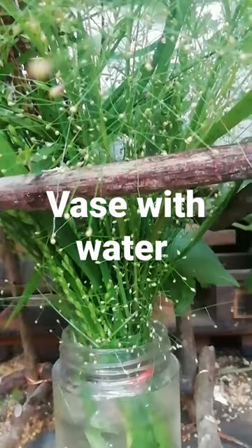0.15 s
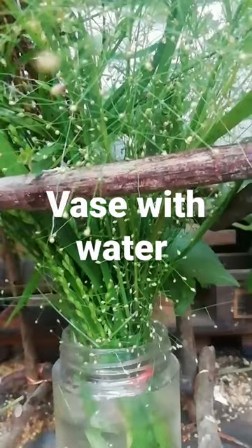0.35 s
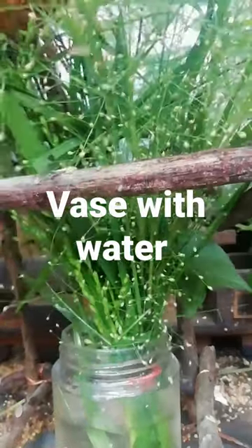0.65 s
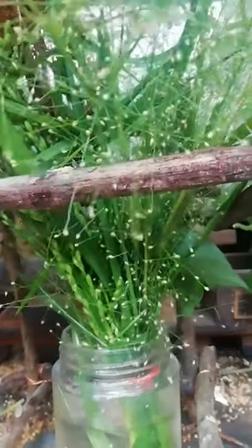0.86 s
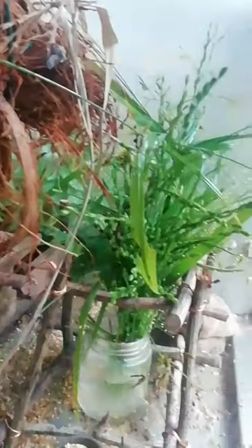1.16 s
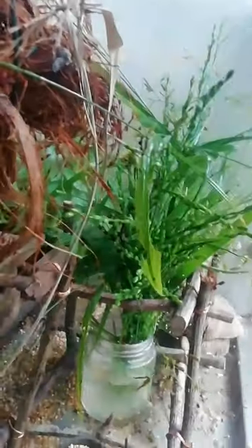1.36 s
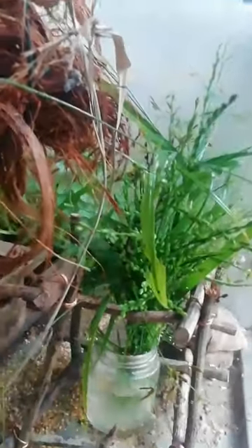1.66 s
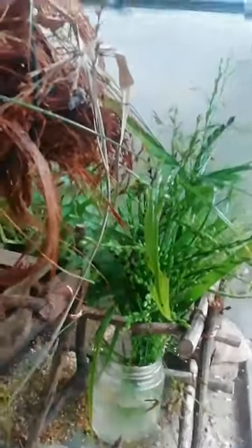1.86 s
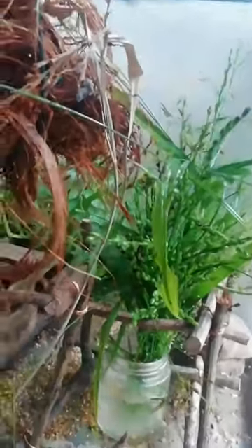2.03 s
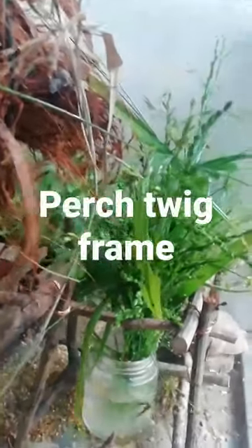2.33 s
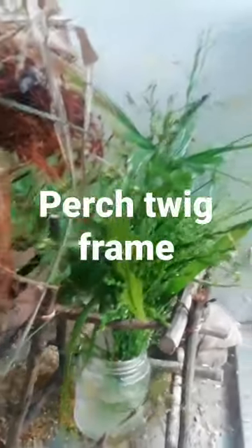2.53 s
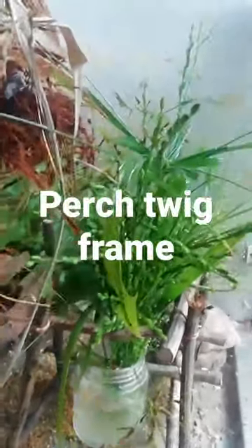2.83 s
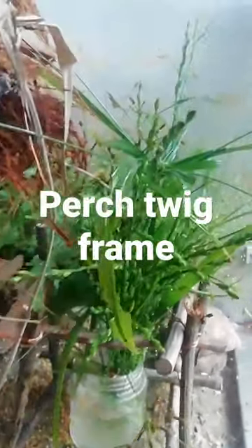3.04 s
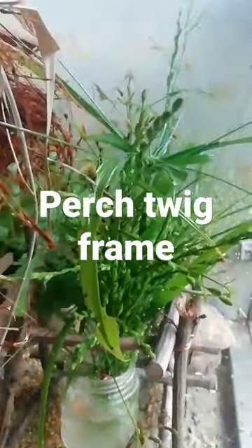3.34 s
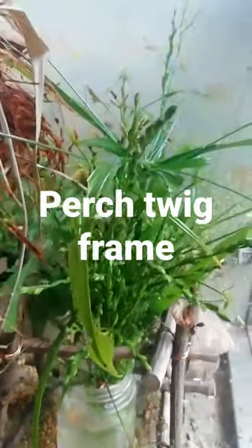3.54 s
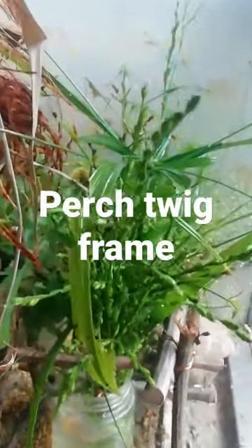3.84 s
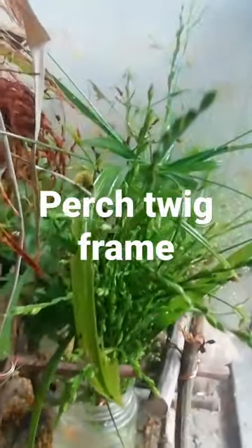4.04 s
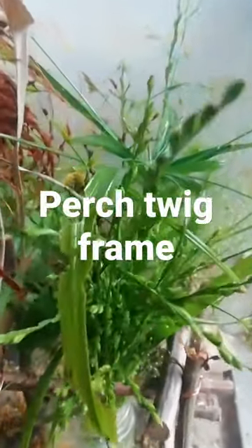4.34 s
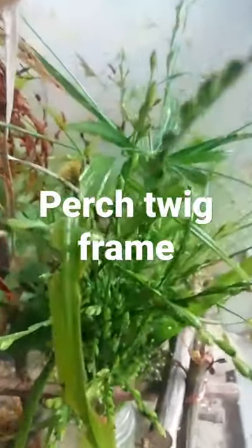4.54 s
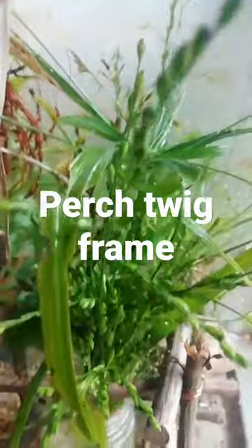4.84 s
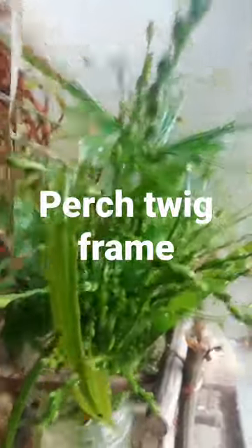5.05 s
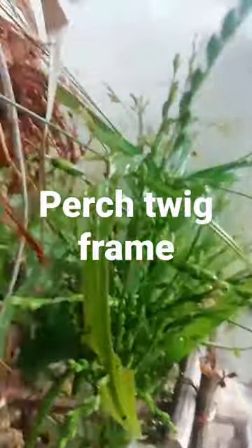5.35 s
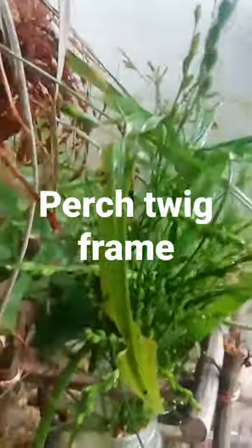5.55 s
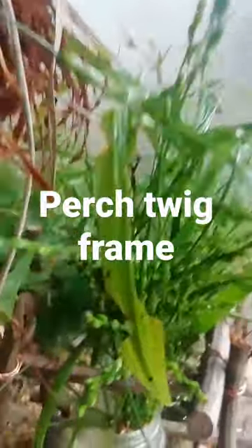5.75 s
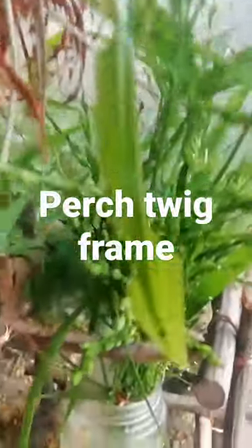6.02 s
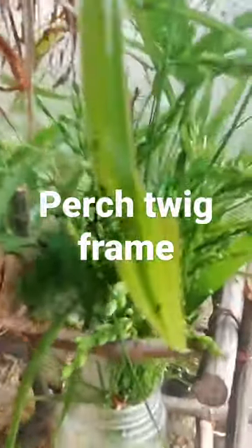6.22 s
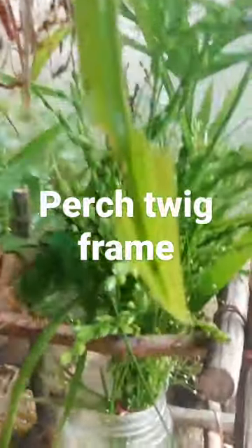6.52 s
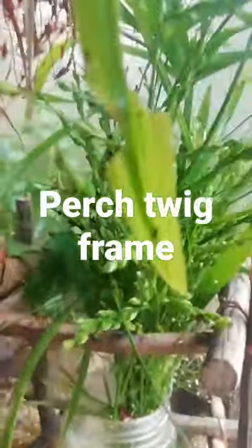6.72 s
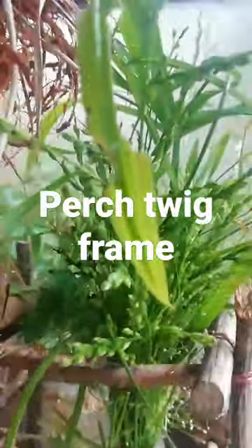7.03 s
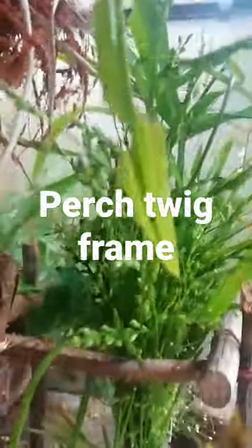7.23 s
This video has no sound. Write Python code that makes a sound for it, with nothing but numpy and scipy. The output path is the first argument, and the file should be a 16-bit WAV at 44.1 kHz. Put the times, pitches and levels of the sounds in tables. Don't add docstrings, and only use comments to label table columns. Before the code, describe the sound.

Patchy hiss and a low building rumble fill a small room. Tiny feet tick on twigs, husks crack and wood knocks dully, with weak early calls. Sound cuts to silence for under half a second, resumes with more crackling, then small finches burst into short toy-horn beeps and five quick song phrases, with a wing flutter, distant peeps and soft air puffs on the close handheld microphone.

```python
import sys
import numpy as np
from scipy import signal
from scipy.fft import rfft, irfft
from scipy.io import wavfile
from scipy.ndimage import uniform_filter1d

SR = 44100
rng = np.random.default_rng(int(sys.argv[2]) if len(sys.argv) > 2 else 0)


def magnitude_from_level(level_db):
    exponent = np.asarray(level_db, float) / 20
    return 10 ** exponent


def to_wav(sig):
    pcm = np.clip(np.atleast_2d(sig), -1, 1) * 32767
    pcm = np.round(pcm).astype(np.int16)
    wavfile.write(sys.argv[1], SR, pcm.T)


N = 325458

# frequency in Hz, level in dB per Hz.
HISS_COLOUR = [(88, -32), (150, -5), (249, -17), (388, -3), (573, -10.5), (812, 0.5), (1010, -0.5),
               (1840, -2.5), (2710, -7.5), (5240, -10.5), (7880, -6), (9940, -14), (12300, -21.5),
               (15500, -26)]
# frequency in Hz, likeness from 0 to 1.
PORT_LIKENESS = [(150, 0.41), (300, 0.83), (700, 0.31), (1500, 0.47), (4000, 0.16), (15000, 0.0297)]
# hiss level in dB, extra murmur near 1.5 kHz in dB.
VIEWS = [
    (-50.5, 4.5),
    (-51, 1),
]
# frequency in Hz, level in dB per Hz.
RUMBLE_COLOUR = [(12, -41.5), (20, -10), (48, 4), (100, 1), (130, -1), (157, -2.5), (236, -11.5), (274, -8),
                 (300, -10), (390, -16.5), (660, -120)]
# peak time in seconds, level in dB, rise in seconds, fall in seconds.
PUFFS = [
    (.82, -59.5, 0.062, 0.14),
    (2, -57.5, 0.15, 0.4),
    (3, -68, 0.059, 0.23),
    (3.57, -55.5, 0.37, 0.037),
    (4.3, -61, 0.33, 0.38),
    (5.15, -56, .1, .06),
    (6.27, -39.5, 0.07, .07),
    (6.84, -54, 0.046, 0.04),
    (7.24, -52, 0.078, .04),
]
# start in seconds, level in dB, 60 dB decay in seconds, left-right in dB.
LANDINGS = [(.054, -41, 0.22, 2), (.2838, -39.5, .13, -2), (.6304, -37.5, .15, -3), (.7989, -39, 0.23, -2),
            (.9775, -38.5, 0.15, 4), (1.7438, -39.5, 0.71, 2), (1.8632, -42, 0.093, -2),
            (1.905, -39, .12, -2), (2.857, -39, 0.69, -4), (3.2694, -30, 0.21, -1),
            (3.3164, -37.5, 0.3, -.5), (3.7838, -35, 0.045, -7), (3.9967, -36, 0.32, -4),
            (4.6283, -34.5, 0.26, -1), (6.143, -44, .12, 10), (6.2504, -40, 0.18, 3)]
# start in seconds, level in dB, 60 dB decay in seconds, left-right in dB.
CRACKS = [(.156, -37, .12, 3), (.8974, -45, 0.2, 7.5), (1.949, -37, .066, -2), (1.9849, -40, 0.098, 3),
          (2.028, -37.5, 0.062, 3), (2.059, -53, .12, -.5), (2.3246, -32, 0.056, -3),
          (2.4434, -32.5, 0.079, -5), (2.6364, -36, 0.6, -2), (3.23, -31, 0.13, -1.5),
          (3.4703, -25, 0.28, 2), (4.792, -29.5, 0.44, 1), (4.8703, -31.5, 0.21, -3),
          (5.997, -41.5, .12, 8), (6.626, -34, 0.25, -2)]
# start in seconds, level in dB, 60 dB decay in seconds, left-right in dB.
HOPS = [(.1852, -35, 0.13, 3), (.436, -38, .12, -3), (2.1588, -35.5, .12, -5), (2.5023, -46, .12, 4),
        (2.5757, -29, 0.14, -2), (2.7105, -32.5, 0.081, -5), (3.4174, -34.5, 0.1, 0),
        (3.8554, -33, .086, -2), (4.2368, -36, .094, -3), (5.3085, -32.5, 0.18, -4),
        (5.4458, -31, 0.22, -1.5), (5.7573, -36.5, 0.45, -3), (6.345, -38, 0.19, 0)]
# start in seconds, peak in dB, pitch in Hz, 60 dB decay in seconds.
KNOCKS = [(0.189, -39, 294, 0.1), (0.275, -40.5, 275, 0.12), (0.536, -36, 455, 0.048),
          (0.789, -42, 305, 0.32), (1.176, -35, 285, 0.07), (2.596, -42, 276, 0.096),
          (5.113, -40.5, 184, 0.35), (6.699, -29, 450, 0.067), (6.885, -48, 380, 0.12),
          (7.051, -39.5, 354.5, 0.51), (7.202, -35, 294, 0.09)]
# start in seconds, length in seconds, peak in dB, pitch in Hz, beak resonance in Hz.
CLEAR_CALLS = [(0.559, 0.048, -44.5, 488, 3900), (1.083, 0.037, -48.5, 570, 3110),
               (1.138, 0.035, -41.5, 588, 4130), (3.016, 0.042, -30, 580, 4300),
               (3.493, 0.054, -32.5, 554.6, 4560), (4.171, 0.042, -30.5, 574, 4600),
               (4.792, 0.044, -31.5, 553.5, 4600), (5.579, 0.055, -34, 476, 3400),
               (6.102, 0.031, -43, 598, 3520), (6.147, 0.044, -28, 591, 4200),
               (6.53, 0.036, -27.5, 584, 4260), (7.2, 0.04, -28.5, 568.7, 4900)]
# start in seconds, length in seconds, peak in dB, pitch in Hz, beak resonance in Hz.
NASAL_CALLS = [(2.974, 0.032, -39.5, 585, 3700), (3.15, .027, -33.5, 598, 4400),
               (3.238, 0.054, -36, 568, 4230), (3.336, 0.027, -34.5, 567, 4400),
               (3.442, 0.054, -39, 585, 4020), (3.92, 0.04, -35, 571.5, 4400),
               (4.015, 0.045, -36, 550, 4570), (4.128, 0.022, -41, 566, 3760),
               (4.624, 0.036, -37, 572, 4800), (4.733, .065, -38, 572, 2530),
               (6.483, 0.038, -43.5, 584, 3540), (6.951, 0.034, -37.5, 593, 4460),
               (7.04, 0.045, -36.5, 581, 3800), (7.149, 0.041, -40.5, 561, 3740)]
# frequency in Hz, gain in dB.
THROAT = [(290, -34.5), (500, -39), (1160, -0.5), (1470, -5), (2820, 1), (3420, -0.5), (3970, -1),
          (5220, 0.5), (5980, 2), (8880, -1.5), (13000, -33)]
# start in seconds, length in seconds, first pitch in Hz, last pitch in Hz, level in dB.
FAR_WHISTLES = [
    (.645, .03, 2050, 2130, -42),
    (3.07, .1, 4750, 4500, -52),
    (4.47, .16, 6150, 5750, -45),
    (5.095, .07, 4850, 4500, -52),
    (5.41, .045, 3600, 3530, -50),
    (5.645, .115, 3940, 3860, -48),
    (5.77, .05, 3220, 3250, -56),
    (6.26, .07, 2000, 1900, -48),
]
# whistle start in seconds, second partial in Hz, its level in dB,
# lift of the first partial in dB, left-right in dB.
SONG = [
    (3.608, 5116, -25, 2.5, 1),
    (4.295, 5054, -23, 10, -6),
    (4.905, 5104, -23, 6.5, -5),
    (6.649, 5160, -21, 0, -1.5),
    (7.331, 5120, -22, -2.5, 8),
]
# start in seconds, pitch in Hz, level in dB, beak resonance in Hz,
# left-right in dB.
HIGH_STACKS = [
    (3.716, 1009, -34, 4630, -4),
    (4.401, 1002, -31, 4400, -3.5),
    (5.012, 1003, -31, 5070, -0.5),
    (6.753, 1014, -29.5, 5600, -1.5),
]
# multiple of the pitch, level in dB.
HIGH_PARTIALS = [(1, -14.5), (2, -20), (3, -7), (4, -1), (5, 0.5), (6, -5.5), (7, -5.5), (8, -9),
                 (9, -20.5)]

CUT_S, RESUME_S = 1.201, 1.595
PORT_LAG_S = 26 / SR
EAR_TURNS = .14
EDGE_ROUGH = .35
LIFT_S, LIFT_DB, LIFT_MURMUR_DB = 0.18, 3, -1
MURMUR_FADE_DB_PER_S = 0.63
GLIDE, GLIDE_S, DROOP_PER_S, SWELL_DB_PER_S = 0.24, .007, 0.26, 109
OPEN_S, HOLD_S, RISE_S, RELEASE_DB_PER_S = 0.011, .032, 0.0039, 1300


def unit_power(x):
    return x / np.sqrt(np.mean(abs(x) ** 2) + 1e-20)


def read(points, hz):
    f, value = np.transpose(points)
    return np.interp(np.log(hz + 1), np.log(f + 1), value)


def add(mix, s, sound):
    part = mix[:, round(s * SR):][:, :sound.shape[1]]
    part += sound[:, :part.shape[1]]


def panned(pan_db):
    return magnitude_from_level(np.array([[.5], [-.5]]) * pan_db)


def band(x, lo_hz, hi_hz):
    return signal.sosfilt(signal.butter(2, [lo_hz, hi_hz], "band", fs=SR, output="sos"), x)


def hiss():
    frames, hz = N // 128 + 5, np.fft.rfftfreq(512, 1 / SR)
    a, b, c, d, patches = rng.standard_normal((frames, 257, 5)).T
    patches = unit_power(uniform_filter1d(uniform_filter1d(patches, 8, 0), 14, 1))
    flicker = unit_power(uniform_filter1d(rng.standard_normal(frames), 10))
    t = np.arange(frames) * 128 / SR
    lift = sum(np.exp(-((t - song[0] - .5 * LIFT_S) / LIFT_S) ** 2) for song in SONG)
    view_levels = np.transpose(VIEWS)[:, (t > CUT_S).astype(int)]
    db, murmur_db = view_levels + np.outer([LIFT_DB, LIFT_MURMUR_DB], lift)
    murmur_db = murmur_db - MURMUR_FADE_DB_PER_S * np.maximum(t - RESUME_S, 0)
    murmur = np.exp(-np.log((hz[:, None] + 1) / 1400) ** 2 / 0.16) * murmur_db
    same = np.clip(read(PORT_LIKENESS, hz), -1, 1)[:, None]
    late = np.exp(-2j * np.pi * hz * PORT_LAG_S)[:, None]
    right = a + 1j * b
    left = magnitude_from_level(-2.0) * (same * late * right + np.sqrt(1 - same ** 2) * (c + 1j * d))
    spectrum = np.array([left, right])
    spectrum *= magnitude_from_level(read(HISS_COLOUR, hz)[:, None] + murmur + 1.69 * patches + 1.26 * flicker)
    noise = unit_power(signal.istft(spectrum, nperseg=512, noverlap=384)[1][:, :N])
    return noise * magnitude_from_level(np.interp(np.arange(N) / SR, t, db))


def rumble():
    colour = magnitude_from_level(read(RUMBLE_COLOUR, np.fft.rfftfreq(N, 1 / SR)))
    low = irfft(rfft(rng.standard_normal(N)) * colour, N)
    t = np.arange(N) / SR
    sway_hz = np.geomspace(.5, 5, num=12)
    sway = unit_power(sum(np.sin(2 * np.pi * (f * t + rng.random())) / np.sqrt(f) for f in sway_hz))
    puffs = sum(magnitude_from_level(db) * np.exp(np.minimum((t - s) / rise, (s - t) / fall)) for s, db, rise, fall in PUFFS)
    return unit_power(low) * (magnitude_from_level(-58.5 + 2.5 * sway) + puffs)


def scuff(s, db, t60, pan_db, thud_db):
    t = np.arange(SR // 5) / SR
    grit = rng.standard_normal((2, len(t))) * magnitude_from_level(1.1 * np.minimum(rng.exponential(1, len(t)), 4))
    burst = magnitude_from_level(db - 15) * unit_power(band(band(grit, 5620, 9600), 6550, 8660))
    burst += magnitude_from_level(db - 11.0) * unit_power(band(grit, 3730, 9200))
    burst += magnitude_from_level(db + thud_db - 13.5) * unit_power(band(grit, 1000, 2100))
    decay = magnitude_from_level(1.5 - 60 * t / t60) + magnitude_from_level(0.5 - 60 * t / 0.02)
    return s, burst * panned(pan_db) * (1 - np.exp(-t / 0.0012)) * decay


def knock(s, db, hz, t60):
    t = np.arange(SR // 5) / SR
    ring = np.sin(2 * np.pi * hz * t - np.array([[1.2], [0]]))
    return s, ring * (1 - np.exp(-t / 0.0016)) * magnitude_from_level(db - 4.5 - 60 * t / t60)


def stack(hz, partial_db, rough, scatter_db, spread_hz=260):
    shape = (2,) + partial_db.shape
    one_each = shape[:2] + (1,)
    wobble = rng.standard_normal(shape) + 1j * rng.standard_normal(shape)
    pole = [1, -np.exp(-2 * np.pi * spread_hz / SR)]
    wobble = unit_power(signal.lfilter([1], np.convolve(pole, pole), wobble))
    heights = magnitude_from_level(scatter_db * rng.standard_normal(one_each))
    turns = rng.random((shape[1], 1)) + EAR_TURNS * rng.standard_normal(one_each)
    leaves = heights * np.exp(2j * np.pi * turns)
    rough = np.clip(rough, 0, 1)
    order = np.arange(1, len(partial_db) + 1)[:, None]
    tones = magnitude_from_level(partial_db) * np.exp(2j * np.pi * order * np.cumsum(hz) / SR)
    smeared = np.sqrt(1 - rough) + np.sqrt(rough) * wobble
    return (tones * leaves * smeared).real.sum(1) * np.sqrt(2)


def call(s, length, db, hz, beak_hz, rough, sag=.045, odd_db=0):
    u = np.linspace(0, 1, round(1.3 * length * SR))
    pitch = hz * (1 + sag * (.45 - u))
    order = np.arange(1, 21)[:, None]
    beak_db = 9.5 * np.exp(-((order * pitch - beak_hz * (1.1 - .2 * u)) / 950) ** 2)
    effort_db = 1.1 * (db + 25) * np.maximum(np.log2(order * pitch / 5000), 0)
    swell = np.sin(np.pi * u ** 0.76) ** 2.1
    uneven = magnitude_from_level(3.05 * unit_power(uniform_filter1d(rng.standard_normal(len(u)), 90)))
    partial_db = read(THROAT, order * pitch) + beak_db + effort_db + odd_db * (order % 2)
    voice = stack(pitch, partial_db, np.minimum(rough, .8) + EDGE_ROUGH * (1 - swell), 2.5, 220)
    return s - .003, magnitude_from_level(db) * swell * unit_power(uneven * voice)


def far_whistle(s, length, from_hz, to_hz, db):
    hz = np.linspace(from_hz, to_hz, round(length * SR))
    voice = stack(hz, np.full((1, len(hz)), db), .6, 0, 110)
    return s, voice * panned(-10.5) * signal.windows.tukey(len(hz), .8)


def flutter():
    s, length, db, beat_hz = 3.275, .1, -43, 46
    t = np.arange(round(length * SR)) / SR
    air = unit_power(band(rng.standard_normal(len(t)), 470, 850))
    air *= 1 + 0.68 * np.sin(2 * np.pi * beat_hz * t)
    return s, magnitude_from_level(db) * air * signal.windows.tukey(len(t), .3) * np.array([[1.2], [-.6]])


def whistle(s, hz, db, first_db, pan_db):
    t = np.arange(0, .08, 1 / SR)
    factor = 1 + GLIDE * np.exp(-t / GLIDE_S) - DROOP_PER_S * (t - OPEN_S - HOLD_S)
    release = -RELEASE_DB_PER_S * np.maximum(t - OPEN_S - HOLD_S, 0)
    growth = SWELL_DB_PER_S * np.minimum(t - OPEN_S - 0.34 * HOLD_S, 0.29 * HOLD_S)
    closed_beak = 40 * np.exp(-np.maximum(t - OPEN_S, 0) / (.5 * RISE_S))
    second = release + growth - closed_beak
    first = -21 + first_db + 2 * release - 20 * np.exp(-t / RISE_S)
    rough = .22 * np.linspace(.2, 2, len(t))
    voice = stack(.5 * hz * factor, np.array([first, second, second - 17]), rough, 0, 150)
    beat_hz = 115 * rng.uniform(0.836, 1.16)
    beat = 1 + .35 * np.cos(2 * np.pi * beat_hz * (t - OPEN_S - RISE_S))
    return s, magnitude_from_level(db) * voice * beat * panned(pan_db)


def high_stack(s, hz, db, beak_hz, pan_db):
    u = np.linspace(0, 1, round(.047 * SR))
    order, order_db = np.transpose(HIGH_PARTIALS)[:, :, None]
    beak_db = 7 * np.exp(-((order * hz - beak_hz * (1.15 - 0.19 * u)) / 900) ** 2)
    pitch = hz * (1 + .014 * (u - .5))
    voice = stack(pitch, order_db + beak_db, .1 + 2 * EDGE_ROUGH * u ** 5, 1.6, 260)
    swell = magnitude_from_level(-6 * (1 - u) ** 2) * signal.windows.tukey(len(u), .3)
    return s, magnitude_from_level(db + 4) * unit_power(voice) * panned(pan_db) * swell


def cage():
    out = np.zeros((2, N))
    for rows, thud_db in ((LANDINGS, 6), (CRACKS, -8), (HOPS, 1)):
        for row in rows:
            add(out, *scuff(*row, thud_db))
    for row in KNOCKS:
        add(out, *knock(*row))
    add(out, *flutter())
    return out


def birds():
    out = np.zeros((2, N))
    for row in CLEAR_CALLS:
        add(out, *call(*row, rough=.1, odd_db=3))
    for row in NASAL_CALLS:
        add(out, *call(*row, rough=.45))
    for row in FAR_WHISTLES:
        add(out, *far_whistle(*row))
    for s, hz, db, first_db, pan_db in SONG:
        add(out, *whistle(s, hz, db, first_db, pan_db))
        add(out, *call(s + .035, .052, db - 8.5, 650, 4000, rough=.6, sag=.1))
        add(out, *call(s + .15, .066, db - 14, 645, 3500, rough=.12, sag=.1))
    for row in HIGH_STACKS:
        add(out, *high_stack(*row))
    return out


def room(x, t60=0.1):
    t = np.arange(SR // 3) / SR
    taps = rng.choice([-1., 1.], (2, len(t))) * (rng.random((2, len(t))) < .05)
    taps = taps * magnitude_from_level(-60 * t / t60) * (t > .003)
    return signal.fftconvolve(x, taps / np.linalg.norm(taps, axis=1, keepdims=True), axes=1)[:, :N]


def scene():
    near = birds() + cage()
    return near + magnitude_from_level(-9) * room(near) + magnitude_from_level(5.0) * hiss() + rumble()


def roll_off(x):
    return signal.sosfilt(signal.butter(12, 15690, fs=SR, output="sos"), x)


def record(dry):
    t = np.arange(N) / SR
    since = np.maximum(t - RESUME_S, 0)
    offset = -magnitude_from_level(-29.5) * np.exp(-since / 0.26 - (since / 0.2) ** 2) - magnitude_from_level(-81)
    gate = np.clip((CUT_S - t) / 0.002, 0, 1) + (t > RESUME_S)
    edited = gate * dry + (t > RESUME_S) * offset
    lowpass = signal.firwin(255, 15250, window=("kaiser", 9), fs=SR)
    limited = signal.oaconvolve(edited, lowpass[None], "same")
    return roll_off(limited)


dry = scene()
out = record(dry)
to_wav(out)
```